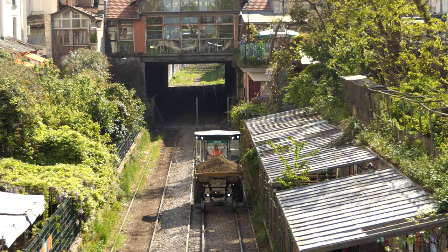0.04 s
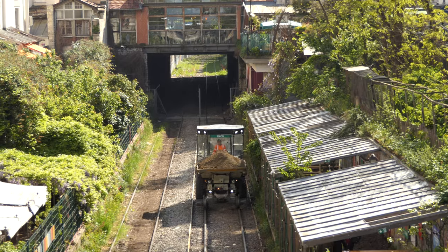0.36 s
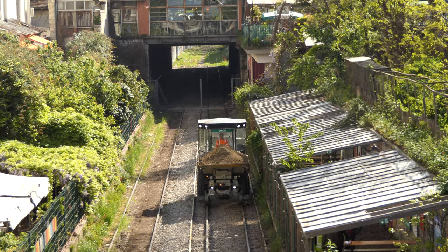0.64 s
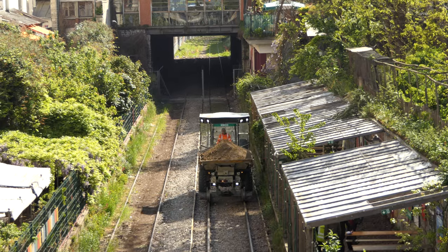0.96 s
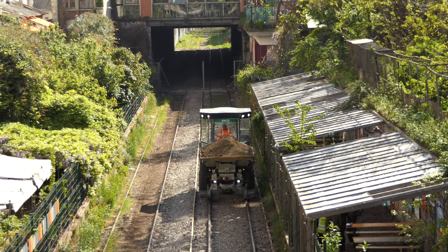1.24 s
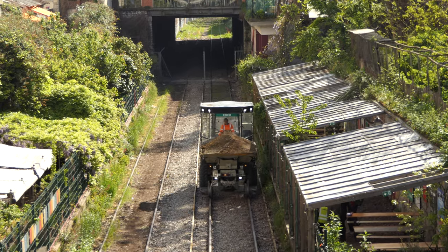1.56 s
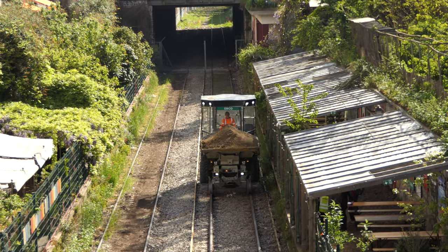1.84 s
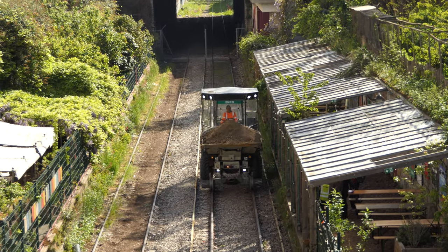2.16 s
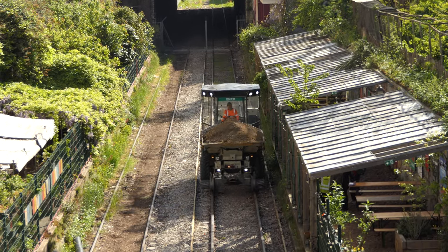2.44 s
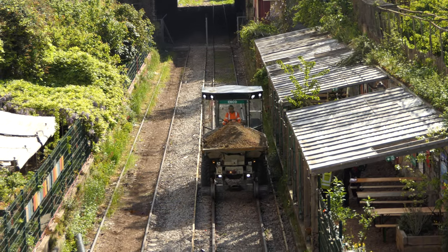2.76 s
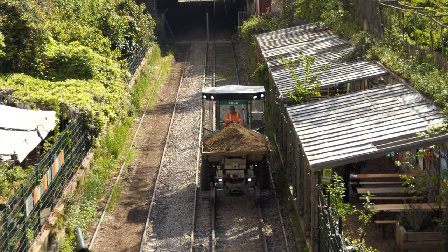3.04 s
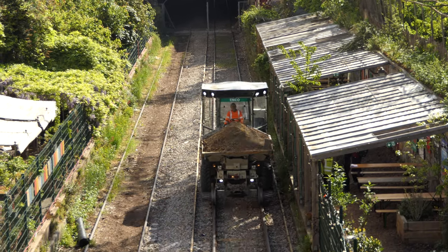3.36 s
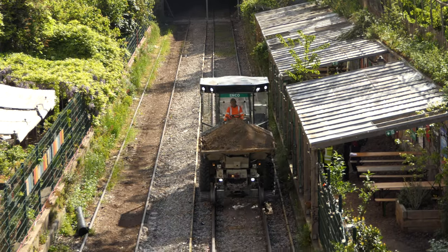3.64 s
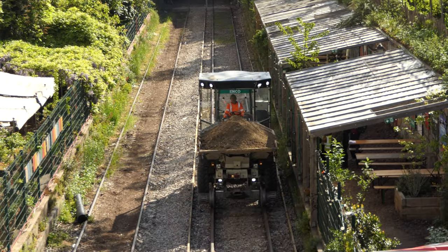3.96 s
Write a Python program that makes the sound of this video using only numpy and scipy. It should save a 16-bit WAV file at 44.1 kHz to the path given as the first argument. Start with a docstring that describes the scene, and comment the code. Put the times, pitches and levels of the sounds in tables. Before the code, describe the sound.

A small rail vehicle rolls slowly closer for four seconds, its steel wheels squealing in very high, flickering tones over steady rumble and gritty scraping. A wavering engine hum and whine and a soft throb run underneath. Brief flange squeaks come near 0.8, 1.9 and 3 seconds, and dull body knocks near 1.4, 2.8, 3.1 and 3.4. The squeal and hiss grow slightly stronger toward the end.

```python
"""Works vehicle on rails

A small vehicle loaded with sand rolls slowly closer in a leafy cutting. Its steel wheels scrape
the rails and squeal in their high modes, which take turns at being loudest. Underneath: rolling
rumble, gritty scraping, drive hum and whine, a running-gear throb, flange squeaks, body knocks."""
import sys
import numpy as np
from scipy import signal
from scipy.fft import rfft, irfft
from scipy.io import wavfile
from scipy.ndimage import uniform_filter1d

SR = 44100
rng = np.random.default_rng(int(sys.argv[2]) if len(sys.argv) > 2 else 0)


def to_wav(s):
    """Save 16-bit WAV."""
    ch = np.atleast_2d(s).T  # columns
    pcm = np.round(np.clip(ch, -1, 1) * 32767)  # PCM
    wavfile.write(sys.argv[1], SR, pcm.astype(np.int16))


N = 176400
T = np.arange(N) / SR
HZ = np.fft.rfftfreq(N, 1 / SR)

# wheel mode envelopes (time [s], level [dB])
MODE_1 = [(0.06, -41.5), (0.12, -53), (0.26, -54), (0.28, -64), (0.33, -42), (0.59, -62), (0.62, -37.5),
          (0.68, -52), (0.76, -44), (0.86, -51), (0.9, -39.5), (1.12, -52), (1.2, -43), (1.27, -52),
          (1.69, -47), (1.72, -57), (1.87, -39), (1.97, -51), (2.5, -47), (2.54, -61), (2.61, -49),
          (3.54, -56), (3.57, -43.5), (3.8, -53.5), (3.92, -46), (4.0, -59)]
MODE_2 = [(0.06, -52), (0.42, -49), (0.5, -35.5), (0.54, -51), (1.01, -45), (1.1, -55), (1.17, -47.5),
          (1.75, -46), (1.79, -51), (1.83, -41), (1.87, -49), (1.95, -42.5), (2.19, -57), (2.23, -42),
          (2.37, -38.5), (2.41, -48), (2.45, -41), (2.53, -53), (2.62, -44), (2.65, -60), (2.73, -39),
          (2.75, -48), (3.54, -50), (3.57, -40), (3.82, -52), (3.83, -39.5), (3.92, -40.5), (4.0, -52)]
MODE_3 = [(0.06, -53), (0.11, -45), (0.36, -52), (0.4, -44), (0.63, -50), (0.67, -43.5), (1.12, -46),
          (1.37, -42), (1.95, -41.5), (2.21, -56), (2.36, -42), (2.63, -62), (2.71, -48), (3.22, -55),
          (3.27, -43), (3.51, -55), (3.59, -39), (4.0, -52)]
MODE_4 = [(0.06, -38), (0.26, -32), (0.82, -35), (0.83, -31.5), (1.32, -37.5), (1.33, -32.5), (1.76, -33),
          (1.78, -37), (1.92, -31.5), (2.2, -55), (2.28, -33), (2.65, -48), (2.73, -36), (2.76, -43),
          (2.9, -52), (3.01, -38.5), (3.19, -46), (3.34, -28.5), (3.36, -38), (3.54, -46), (3.63, -29.5),
          (3.81, -47), (3.89, -25.5), (4.0, -41)]
MODE_5 = [(0.06, -45.5), (0.19, -34.5), (0.31, -47), (0.36, -29.5), (0.48, -35), (0.51, -44), (0.59, -49),
          (0.67, -26.5), (0.72, -36.5), (0.75, -25), (0.77, -32.5), (0.92, -43), (0.97, -27.5),
          (1.0, -40.5), (1.11, -46.5), (1.24, -25.5), (1.3, -33), (1.32, -29.5), (1.41, -43.5),
          (1.46, -32.5), (1.71, -47), (1.79, -27.5), (1.9, -40.5), (2.02, -24), (2.14, -45.5),
          (2.41, -27.5), (3.23, -27), (3.25, -23.5), (3.34, -42), (3.36, -30.5), (3.52, -23.5), (3.64, -36),
          (3.77, -23.5), (3.78, -34), (3.82, -23.5), (3.9, -36), (3.92, -30), (4.0, -29)]
MODE_6 = [(0.06, -63), (0.08, -52), (0.3, -61), (0.38, -44), (0.54, -68), (0.67, -44), (0.83, -57),
          (0.93, -46), (1.13, -59), (1.24, -42), (1.4, -61), (1.96, -51), (2.21, -30), (2.32, -44.5),
          (2.45, -38), (2.52, -46), (2.92, -50), (2.95, -44), (3.68, -49), (3.69, -38.5), (3.79, -52),
          (3.86, -37), (3.9, -44), (4.0, -37)]
TOP_MODES = [(.06, -63.5), (2.0, -61.5), (2.18, -72), (2.3, -61), (3.0, -67), (4.0, -55)]
# drive envelopes (time [s], level [dB])
HUM_LEVEL = [(0.06, -54), (0.12, -45.5), (2.23, -42.5), (2.5, -36.5), (2.62, -53), (2.81, -31),
             (2.84, -35.5), (3.45, -33), (3.49, -47), (4.0, -39)]
WHINE_LEVEL = [(0.06, -43.5), (0.64, -45), (1.15, -44), (1.45, -51.5), (1.54, -37), (1.57, -50),
               (3.46, -44.5), (3.65, -39), (3.91, -46.5), (4.0, -39)]


def amp(db):
    """Decibels to gain."""
    return 10 ** (np.asarray(db) / 20)


def unit_rms(x):
    """Scale to rms 1."""
    return x / np.sqrt(np.mean(abs(x) ** 2) + 1e-20)


def envelope(points):
    """Gain over time from (time [s], level [dB])."""
    return amp(np.interp(T, *np.transpose(points)))


def swell(peak_s, half_s):
    """Gaussian envelope."""
    return np.exp(-((T - peak_s) / half_s) ** 2)


def per_bin(points):
    """Interpolate (frequency [Hz], value) onto the FFT bins, in log frequency."""
    hz, value = np.transpose(points)
    return np.interp(np.log(HZ + 1), np.log(hz + 1), value)


def stereo(mid, side, correlation):
    """Left and right from two unrelated signals."""
    side = side * np.sqrt((1 - correlation) / (1 + correlation))
    return np.array([mid + side, mid - side])


def wander(width_hz, order=2):
    """Complex random motion of a resonance; higher order, steeper skirts."""
    noise = rng.standard_normal(N) + 1j * rng.standard_normal(N)
    detuning = 2 * np.fft.fftfreq(N, 1 / SR) / width_hz
    return unit_rms(np.fft.ifft(noise / (1 + detuning ** 2) ** (order / 2)))


def singing(width_hz, steadiness=0.55):
    """Self-sustained vibration: wandering phase, partly steadied strength."""
    motion = wander(width_hz)
    return unit_rms(motion / (abs(motion) + 0.1) ** steadiness)


def tone(hz, width_hz):
    """Wavering tone, rms 1."""
    return unit_rms((singing(width_hz) * np.exp(2j * np.pi * hz * T)).real)


def coloured(pair, spectrum):
    """Give two unrelated signals a spectrum and the stereo width of the cutting; rms 1."""
    # (frequency [Hz], left-right correlation [0-1])
    correlation = [(30, 0.9), (125, 0.99), (250, .96), (500, 0.9), (1000, 0.73), (2000, 0.75), (4000, 0.74),
                   (9000, 0.7), (15000, 0.54)]
    mid, side = rfft(pair) * amp(per_bin(spectrum))
    return unit_rms(irfft(stereo(mid, side, per_bin(correlation)), N))


def wheel_squeal():
    """Friction drives each wheel mode: a singing line in a fuzzy band, rising slightly on approach."""
    # wheel modes (envelope, fuzz centre [Hz], width [Hz], gain [dB], line [Hz], width [Hz], gain [dB])
    modes = [ (MODE_1, 3430, 190, -3, 3445, 50, -5), (MODE_2, 4910, 280, -1.5, 4912, 92, -12),
             (MODE_3, 6430, 260, -1.1, 6445, 53, -6.5), (MODE_4, 8020, 294, -.8, 8100, 29, -4),
             (MODE_5, 9680, 284, -1.33, 9745, 22, -3.5), (MODE_6, 11300, 380, -0.81, 11430, 27, -6),
             (TOP_MODES, 12940, 260, 0, 12932, 40, -7), (TOP_MODES, 14540, 240, -8, 14577, 50, -13), ]
    rise_per_s, skirt_db, flutter_db = 0.000702, -9, 1.5
    clock_s = np.cumsum(1 + rise_per_s * (T - T.mean())) / SR
    out = np.zeros((2, N))
    for curve, fuzz_hz, fuzz_width_hz, fuzz_db, line_hz, line_width_hz, line_db in modes:
        fuzz = amp(fuzz_db) * np.exp(2j * np.pi * fuzz_hz * clock_s)
        line = amp(line_db) * np.exp(2j * np.pi * line_hz * clock_s)
        core = wander(fuzz_width_hz, order=3)
        skirt = amp(skirt_db) * wander(4.5 * fuzz_width_hz, order=5)
        mid = fuzz * (core + skirt) + line * singing(line_width_hz)
        side = fuzz * wander(fuzz_width_hz) + line * wander(line_width_hz)
        flutter = amp(flutter_db * wander(width_hz=32).real)
        out += np.sqrt(2) * envelope(curve) * flutter * stereo(mid.real, side.real, correlation=0.93)
    return out


def rolling_rumble():
    """Wheels, frame and track boom as the vehicle rolls."""
    # rumble spectrum (frequency [Hz], relative density [dB])
    spectrum = [(20, -33), (36, -28), (52, -10.5), (64, -7), (76, -9), (100, -4), (135, -0.5), (170, 0.5),
                (250, -.5), (380, -3), (520, -6.5), (720, -12.5), (1200, -19), (4000, -53), (16000, -80)]
    # rumble envelope (time [s], level [dB])
    curve = [(.06, -32), (.9, -34), (1.4, -33.5), (1.85, -34), (2.1, -33), (2.25, -32), (2.6, -31.5),
             (3.3, -31.5), (3.55, -33), (3.7, -32), (4, -31.5)]
    return envelope(curve) * coloured(rng.standard_normal((2, N)), spectrum)


def rough_contact(patch_db=1.55, flicker_db=0.5):
    """Noise pair of uneven contact: drifting spectral patches, shared flicker."""
    frames, bins = N // 128 + 5, 257
    re_1, im_1, re_2, im_2, patches = rng.standard_normal((5, frames, bins))
    patches = uniform_filter1d(patches, size=16, axis=0)
    patches = unit_rms(uniform_filter1d(patches, size=7, axis=1))
    flicker = unit_rms(uniform_filter1d(rng.standard_normal(frames), size=8))[:, None]
    gain = amp(patch_db * patches + flicker_db * flicker)
    spectra = gain * np.array([re_1 + 1j * im_1, re_2 + 1j * im_2])
    return signal.istft(spectra.transpose(0, 2, 1), nperseg=512, noverlap=384)[1][:, :N]


def friction(grit_per_s=260, grit_db=-9.5, spread_db=2.5):
    """Rough contact with fine grit cracking in it; two unrelated signals."""
    cracks = (rng.random((2, N)) < grit_per_s / SR) * rng.choice([-1, 1], (2, N))
    strength = amp(spread_db * np.minimum(rng.exponential(1, (2, N)), 4))
    return unit_rms(rough_contact()) + amp(grit_db) * unit_rms(cracks * strength)


def rail_scrape(scrape_db=1.73, hiss_db=6):
    """Steel scrapes and hisses on steel; the finest fizz comes through on approach."""
    # contact spectra (frequency [Hz], relative density [dB])
    scrape_spectrum = [(20, -40), (400, -17), (720, -3.5), (870, 3), (1200, -1.5), (1450, 1), (1850, -0.5),
                       (2200, -4.5), (2420, -2.5), (2800, -6.5), (3150, -4), (3900, -8), (5400, -13),
                       (8000, -20), (15000, -46)]
    hiss_spectrum = [(20, -50), (2000, -20), (3900, -3.5), (5400, 0), (6000, -4), (7400, -3.5),
                     (9000, -1.5), (10500, -12), (15000, -32)]
    fizz_spectrum = [(20, -60), (6000, -30), (9000, -2), (11000, 7), (12500, -3), (14500, -26)]
    # contact envelopes (time [s], relative level [dB])
    scrape_curve = [(0.06, -39.5), (0.08, -37.5), (0.31, -39.5), (0.38, -37), (0.68, -38), (0.76, -35.5),
                    (0.82, -38), (0.85, -37.5), (2.08, -37), (2.12, -39.5), (2.47, -35), (2.48, -38.5),
                    (2.76, -35.5), (2.8, -39.5), (2.81, -37), (3.06, -36), (3.08, -37.5), (3.14, -37.5),
                    (3.75, -37), (4.0, -35)]
    hiss_curve = [(0.06, -54), (0.22, -48), (0.28, -52), (0.48, -47), (0.6, -54), (0.73, -50), (0.75, -44),
                  (0.81, -49), (0.87, -45), (0.89, -56), (0.97, -48), (1.23, -50), (1.27, -57), (1.32, -46),
                  (1.46, -52), (1.71, -47), (1.78, -52), (1.79, -50), (2.17, -52), (2.2, -57), (2.22, -47),
                  (2.66, -52.5), (2.69, -47), (2.87, -50), (3.44, -46.5), (3.55, -53), (3.57, -42),
                  (3.71, -50.5), (3.96, -45), (4.0, -51)]
    fizz_curve = [(.06, -64), (1.9, -60), (2.4, -52), (2.66, -51), (2.72, -47), (2.79, -51), (3.3, -48),
                  (3.65, -48), (3.7, -42), (3.75, -52), (3.86, -45), (3.92, -45), (4.0, -37)]
    scrape = amp(scrape_db) * envelope(scrape_curve) * coloured(friction(), scrape_spectrum)
    hiss = amp(hiss_db) * envelope(hiss_curve) * coloured(friction(), hiss_spectrum)
    fizz = envelope(fizz_curve) * coloured(friction(), fizz_spectrum)
    return scrape + hiss + fizz


def drive():
    """Engine and gears hum and whine in wavering tones."""
    # drive tones (envelope, frequency [Hz], width [Hz], gain [dB])
    tones = [(HUM_LEVEL, 365, 4.2, -4.5), (HUM_LEVEL, 376, 5.5, -3.5), (WHINE_LEVEL, 835, 4.8, -.5),
             (WHINE_LEVEL, 820, 16, -8), (WHINE_LEVEL, 134, 3.6, -3.5), (WHINE_LEVEL, 497, 13, -11),
             (WHINE_LEVEL, 1818, 11, -12)]
    out = np.zeros((2, N))
    for curve, hz, width_hz, db in tones:
        carrier = np.exp(2j * np.pi * hz * T)
        motion = stereo(singing(width_hz), wander(width_hz), correlation=0.97)
        out += np.sqrt(2) * amp(db) * envelope(curve) * (motion * carrier).real
    return out


def gear_throb(first_s=0.564, period_s=0.282, level_db=-34.5):
    """A soft, low thud with each turn of the running gear."""
    beats = sum(swell(first_s + turn * period_s, half_s=0.022) for turn in range(13))
    return amp(level_db) * beats * tone(hz=151.2, width_hz=45)


def flange_squeaks():
    """A flange catches the rail for a moment."""
    # squeaks (peak time [s], half length [s], frequency [Hz], width [Hz], level [dB])
    squeaks = [(0.777, .04, 3200, 200, -42.5), (1.937, .025, 3170, 120, -44), (2.33, .06, 3230, 160, -49),
               (3.01, 0.027, 1180, 60, -42.5), (3.024, 0.014, 3065, 40, -35.5),
               (3.625, 0.055, 3210, 200, -47), (3.92, .025, 3260, 60, -41.5)]
    return sum(amp(db) * swell(peak_s, half_s) * tone(hz, width_hz)
               for peak_s, half_s, hz, width_hz, db in squeaks)


def body_knocks(rise_s=0.017):
    """Jolts set the loaded body booming briefly."""
    # jolts (time [s], level [dB])
    jolts = [(1.385, -29), (2.79, -28.5), (3.085, -30.5), (3.41, -31.5)]
    # body modes (frequency [Hz], gain [dB], T60 [s])
    modes = [(253.3, -3, 0.35), (310, -4, 0.23), (372.2, -1.5, 0.39), (494, -5, 0.25), (580, -9.5, .2)]
    out = np.zeros(N)
    for hz, mode_db, t60_s in modes:
        ring = tone(hz, width_hz=2.2 / t60_s)
        for start_s, jolt_db in jolts:
            age_s = np.maximum(T - start_s, 0)
            attack = np.minimum(age_s / rise_s, 1)
            out += ring * attack * amp(jolt_db + mode_db - 60 * age_s / t60_s)
    return out


def scene():
    """Stereo sum of the vehicle's sounds."""
    highs = wheel_squeal() + flange_squeaks()
    lows = rolling_rumble() + gear_throb() + body_knocks()
    return highs + lows + rail_scrape() + drive()


def record(dry):
    """Channel balance, quick fade-in, low-pass."""
    left_db, start_s, fade_s, cutoff_hz = -0.15, 0.039, 0.015, 14750
    balance = amp([[left_db], [0]])
    fade_in = np.clip((T - start_s) / fade_s, 0, 1)
    lowpass = signal.firwin(511, cutoff_hz, window=("kaiser", 9), fs=SR)
    return signal.oaconvolve(dry * balance * fade_in, lowpass[None], "same")


dry = scene()
out = record(dry)
to_wav(out)
```